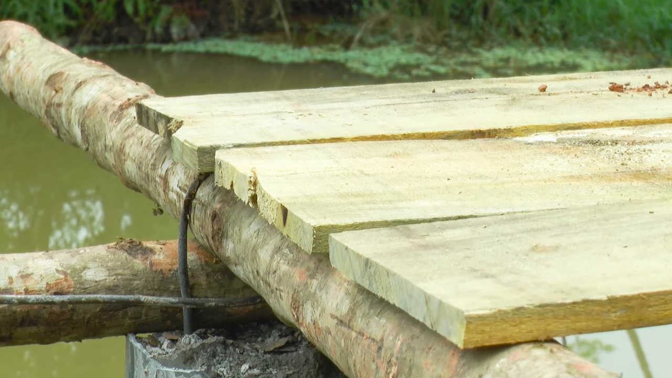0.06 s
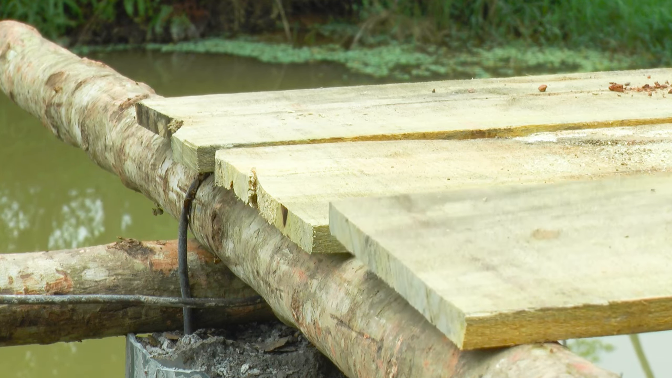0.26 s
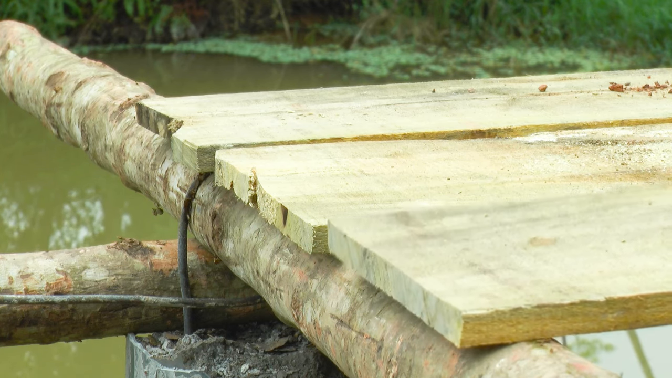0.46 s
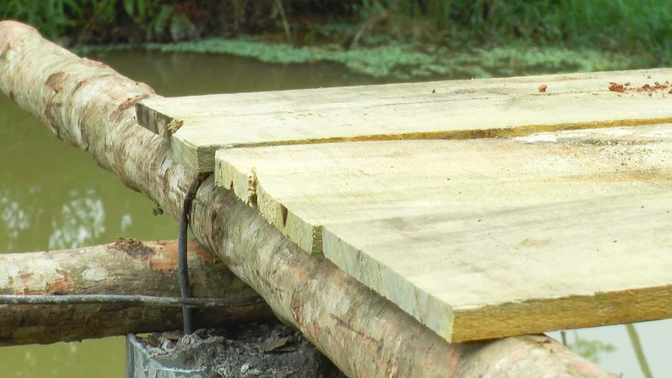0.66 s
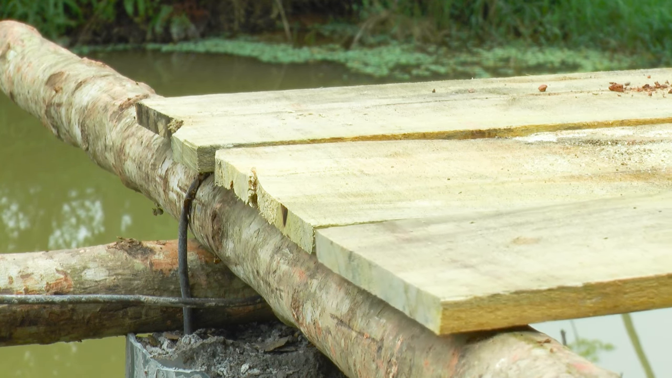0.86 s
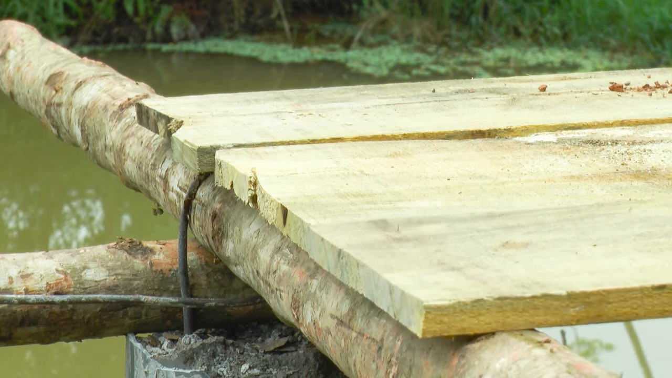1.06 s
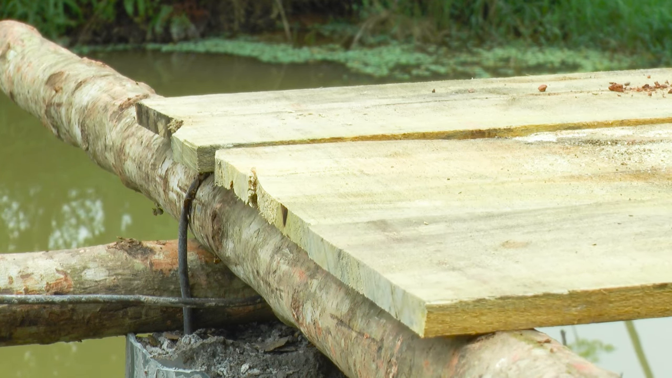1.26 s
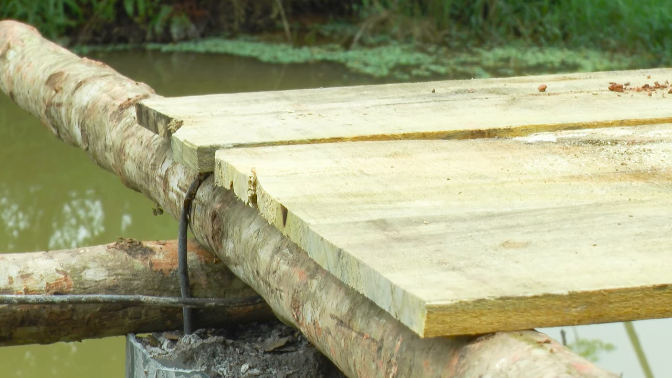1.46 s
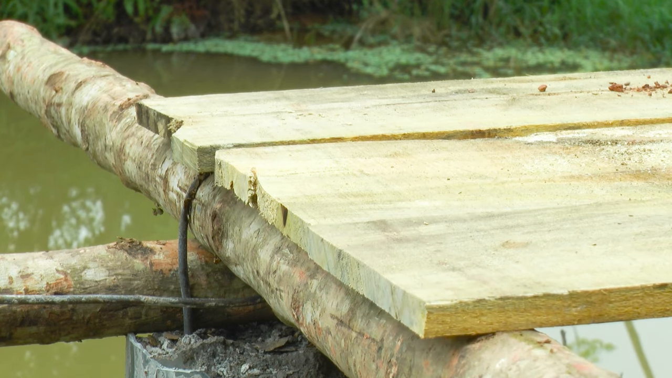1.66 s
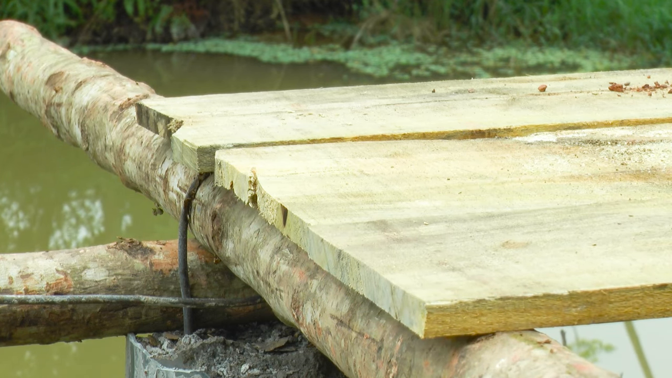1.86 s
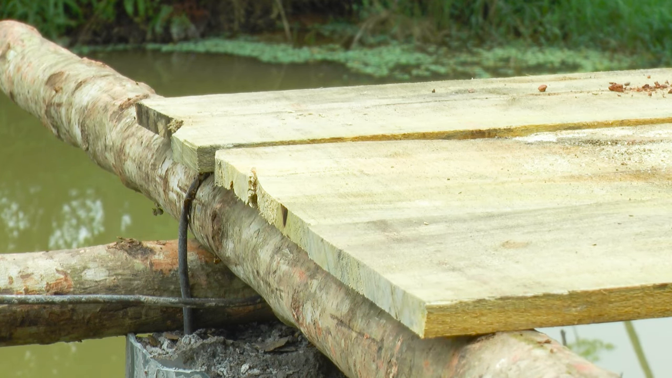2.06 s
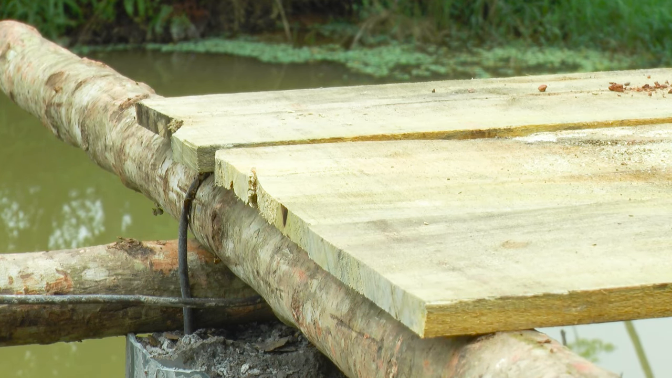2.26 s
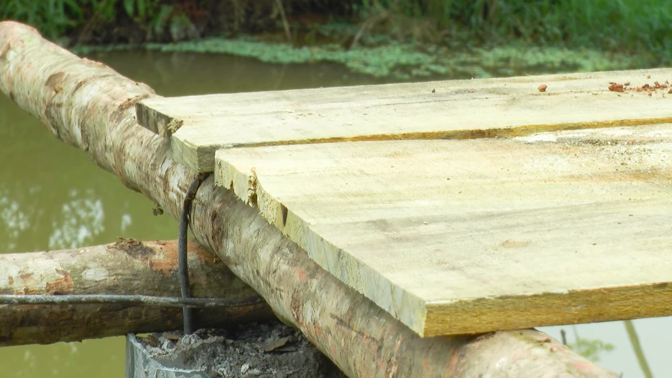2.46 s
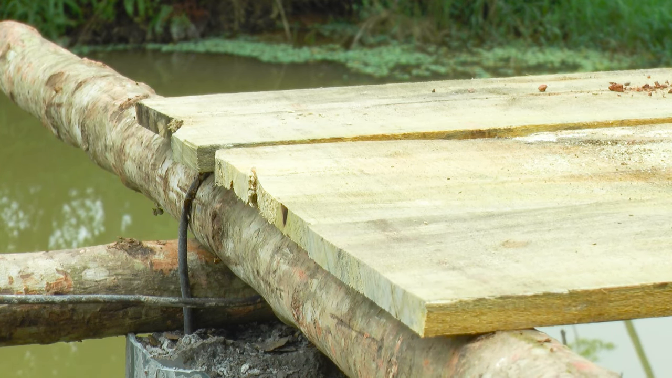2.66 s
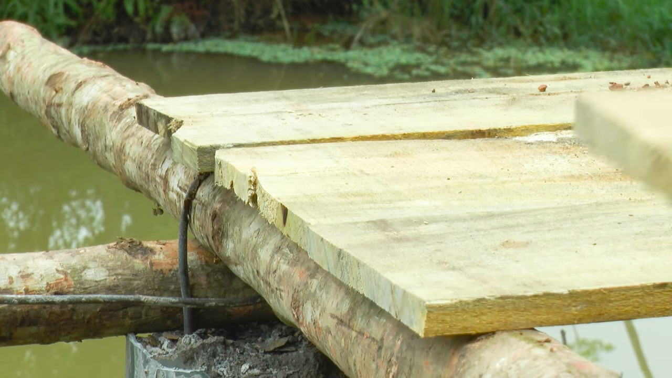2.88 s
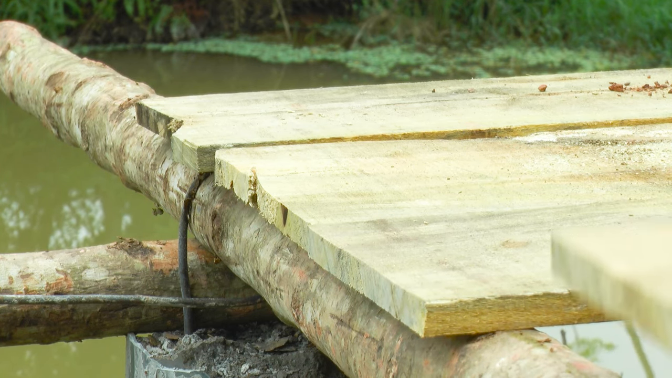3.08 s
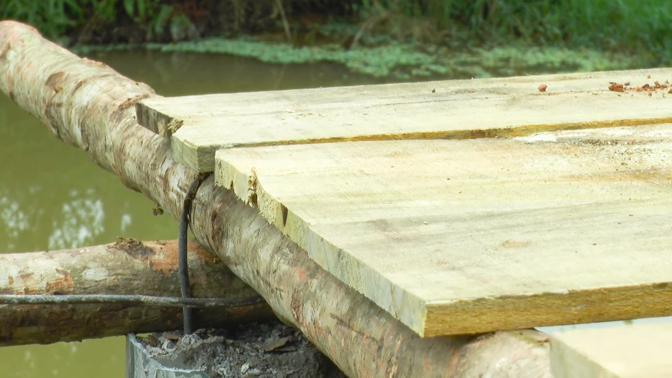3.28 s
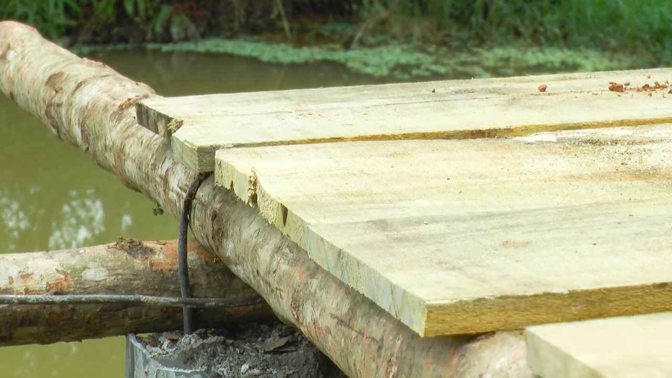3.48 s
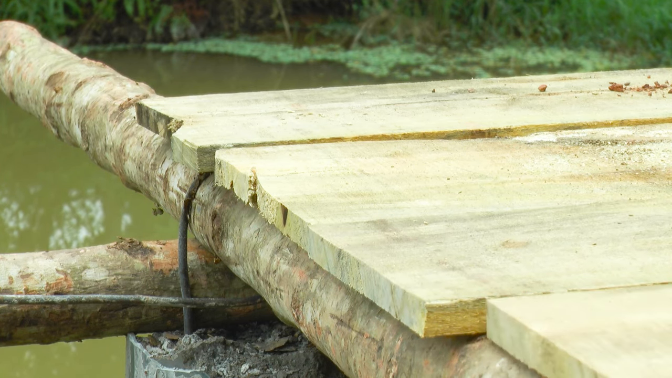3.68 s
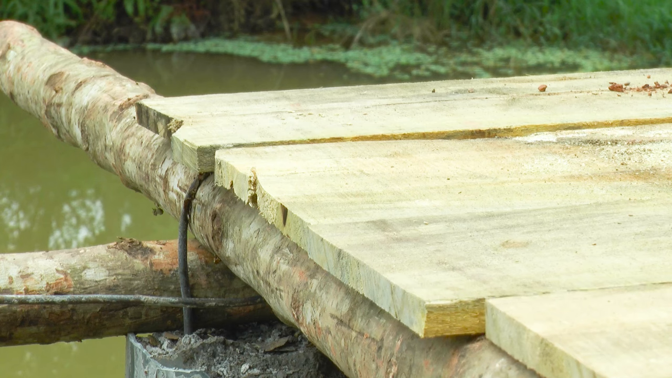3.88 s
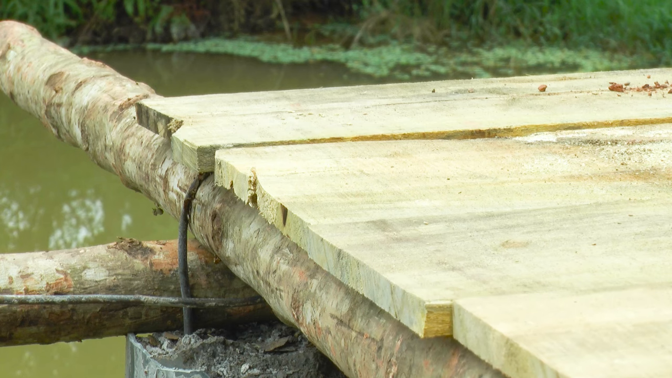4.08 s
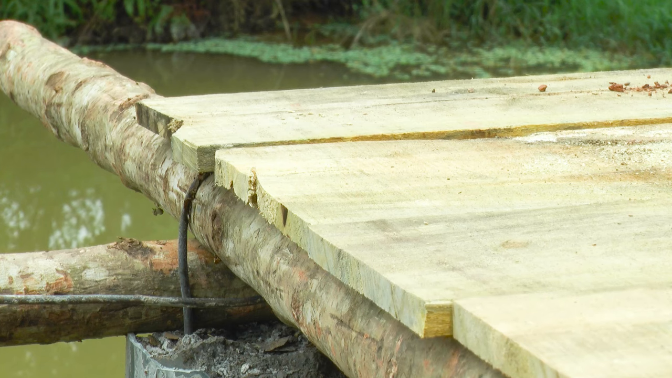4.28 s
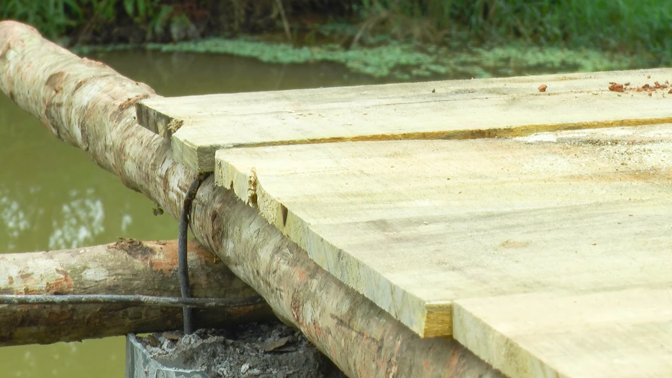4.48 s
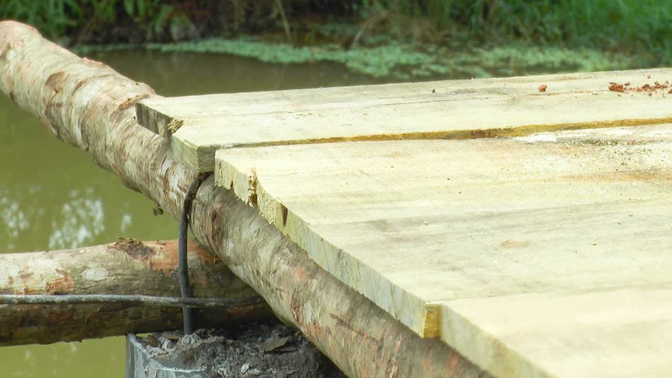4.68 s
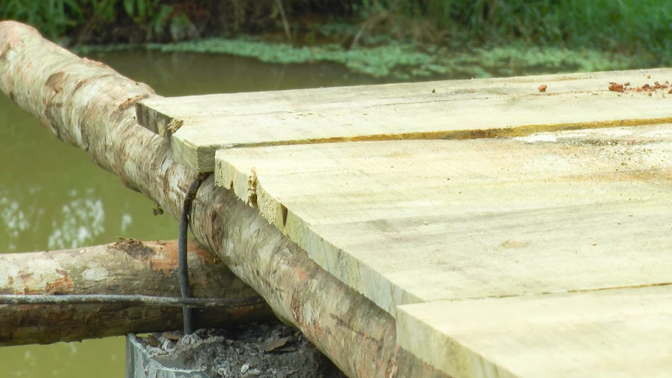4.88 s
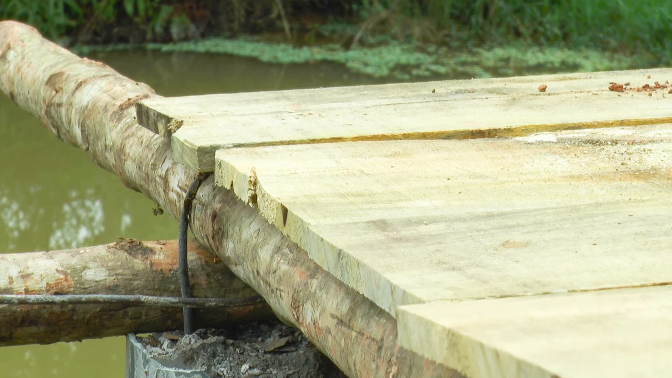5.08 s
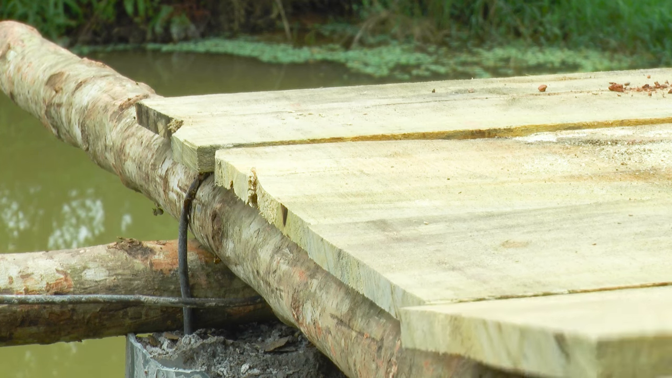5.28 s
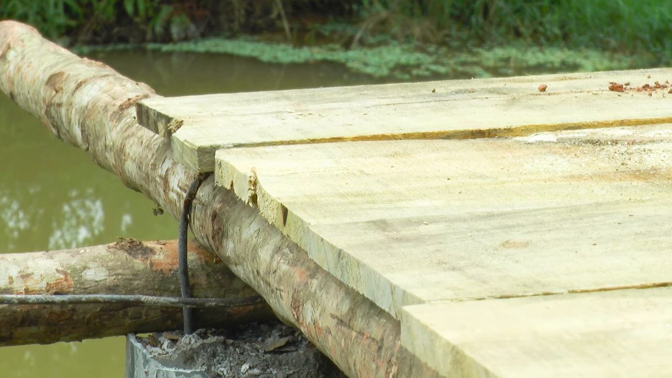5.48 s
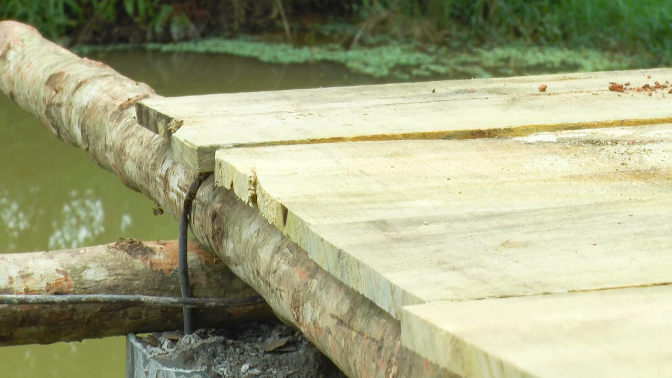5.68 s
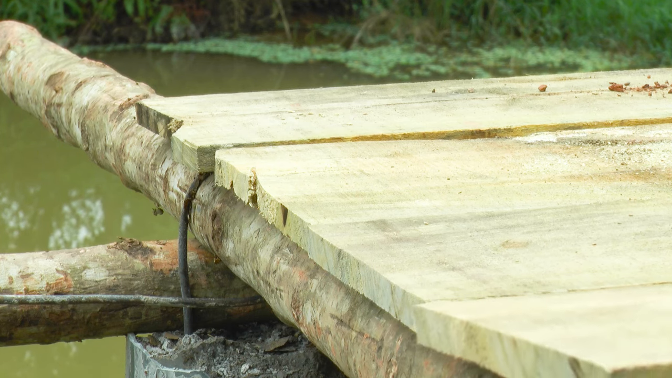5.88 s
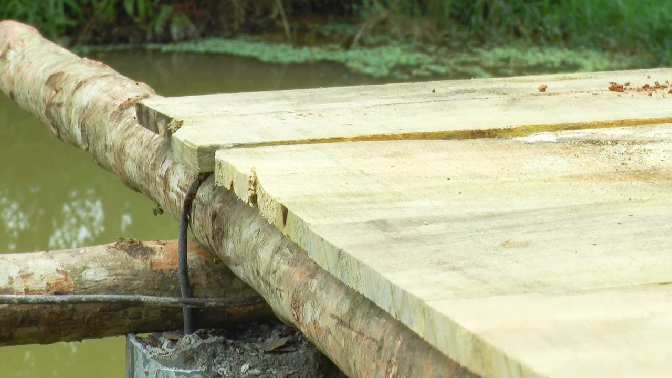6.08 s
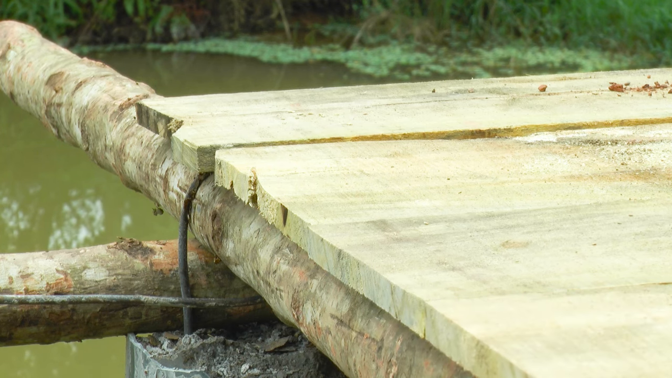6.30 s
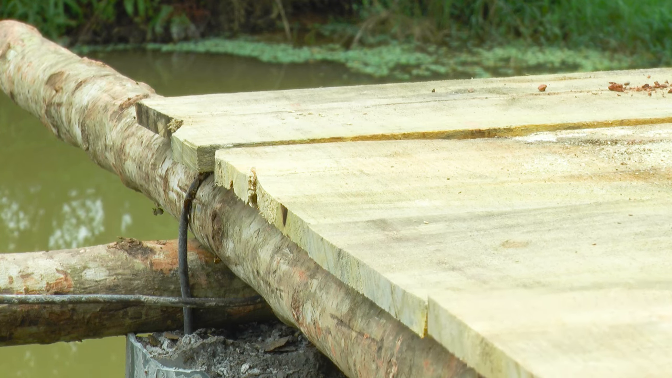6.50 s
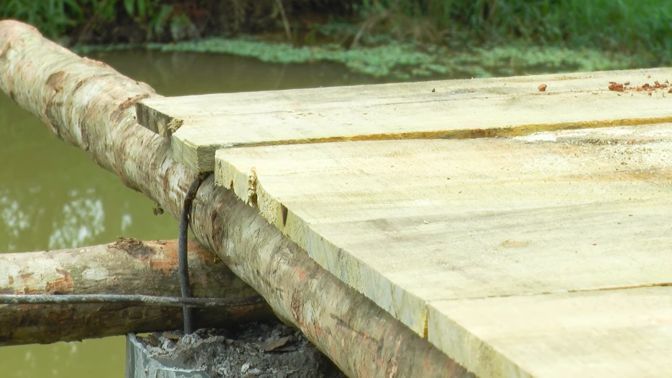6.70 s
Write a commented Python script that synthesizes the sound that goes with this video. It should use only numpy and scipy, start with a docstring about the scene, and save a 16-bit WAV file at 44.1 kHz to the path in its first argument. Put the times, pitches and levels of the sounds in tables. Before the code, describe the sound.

Sawn boards scrape and clatter onto a log frame in three hard landings, with dry rubs, light knocks and hushed outdoor air between.

```python
"""Two sawn boards are slid, dropped and nudged into place on a log frame beside a pond.
Each landing is a clatter of contacts: a filtered tap, decaying board and deck modes, a short noise crack.
Between landings rough wood rubs: bursts of random clicks, coloured and passed through resonances.
Behind: a thin scattered echo, a low noise rumble, a soft hiss that dips once, a faint hum that swells and fades.
"""
import sys
import numpy as np
from scipy import signal
from scipy.fft import rfft, irfft, next_fast_len
from scipy.io import wavfile

SR = 44100
rng = np.random.default_rng(int(sys.argv[2]) if len(sys.argv) > 2 else 0)


def materialize(psi):
    """Save the field psi as 16-bit PCM at rate SR to the path in sys.argv[1].

    A 1-D psi becomes a single channel; in a 2-D psi each row is a channel.
    """
    bounded = np.clip(np.atleast_2d(psi).T, -1, 1)
    quanta = np.round(bounded * 32767).astype(np.int16)
    wavfile.write(sys.argv[1], SR, quanta)


N = 297234

# rumble outdoors, before RUMBLE_TRIM_DB; the hiss follows partly: (time [s], level [dB])
AIR_LEVEL = [(0.0, -54), (1.09, -53), (1.29, -61.5), (1.73, -61.5), (3.59, -59), (3.94, -59.5),
             (6.74, -52.5)]
# noise colours: (frequency [Hz], relative density [dB])
RUMBLE_COLOUR = [(20, -28), (40, -10), (60, 1.5), (100, 1.5), (145, 2.5), (220, -8), (330, -8.5),
                 (480, -22.5), (800, -53), (2000, -68)]
HISS_COLOUR = [(200, 15), (500, 6.5), (900, 4.5), (1500, 2.5), (2400, -1), (3300, -1.5), (4200, -9),
               (6200, -5.5), (8000, -10), (9500, -14.5), (12000, -19), (16000, -21)]
RUB_COLOUR = [(100, -5), (300, 0.5), (600, 4), (1100, 6.5), (1800, 7.5), (2500, 3.5), (3300, 0.5),
              (4200, -13), (5500, -10), (7500, -13), (10000, -54), (16000, -62)]
SPLINTER_COLOUR = [(2000, -30), (5000, -2), (7500, 8), (10000, -5), (13000, -10), (16000, -9)]
CRACK_COLOUR = [(40, -20), (300, -4), (1200, 10), (2600, 0.5), (3400, -3.5), (4200, -22.5), (6500, -15.5),
                (10000, -26.5), (16000, -48)]
# faint far hum: (frequency [Hz], level at the peak [dB])
HUM_TONES = [(145.3, -59), (772, -72.5)]
# sliding strokes of rough wood: (time of top speed [s], rasp level [dB], rise [s], fall [s], edge note [Hz])
RUBS = [ (0.099, -48, 0.18, 0.041, 1570), (.605, -55.5, 0.094, 0.046, 2100),
        (.975, -43, 0.066, 0.048, 1820), (1.254, -55.5, 0.0042, 0.014, 2250),
        (1.69, -58, 0.063, 0.099, 2880), (2.21, -60.5, 0.11, 0.066, 1580), (2.485, -52, 0.069, 0.027, 1060),
        (2.60, -52.5, 0.013, 0.052, 1880), (2.876, -52, 0.009, 0.028, 2250),
        (3.242, -46, 0.047, 0.019, 3070), (3.661, -53.5, .14, 0.073, 1610),
        (4.105, -52.5, 0.062, .036, 1590), (4.794, -45.5, 0.036, .085, 2300),
        (5.55, -53.5, .02, 0.053, 2110), (5.9, -62, 0.029, 0.042, 1500), (6.044, -60, .04, .017, 2720),
        (6.355, -48.5, .065, 0.052, 1660), (6.388, -42.5, .006, 0.031, 1080),
        (6.679, -48.5, 0.03, 0.021, 930)]
# loose splinters brushing: (time of top speed [s], level [dB], rise [s], fall [s])
BRUSHES = [(2.612, -51.5, 0.0018, 0.011), (3.65, -65, 0.15, 0.1)]
# wood on wood: (time [s], level [dB], contact time [ms], bass [dB])
# bass is high when the face lands flat, low when an edge glances
BLOWS = [ (.310, -49, 0.66, 7.5), (.6206, -50, 0.35, -1), (.802, -52.5, 1.3, 9), (.977, -38, 1.54, -4),
         (1.0518, -32, .61, -35), (1.057, -27.5, 1.48, -6.5), (1.071, -34, .8, 4), (1.082, -28, 0.7, -3.5),
         (1.089, -29, 0.89, -1.5), (1.093, -31.5, 0.99, -1), (1.113, -32, .54, -36), (1.250, -46.5, 2.6, 0),
         (1.950, -58, 0.37, -22), (2.856, -50, 0.31, -0.5), (3.286, -27, 0.94, -4),
         (3.294, -33.5, 0.68, -29), (3.302, -31, 1.33, 15), (3.3245, -40, 0.47, -44),
         (3.325, -26.5, .87, -19.5), (3.3465, -29, 0.61, 5), (3.376, -26.5, 0.92, -6),
         (3.385, -30, 1.2, -7), (3.408, -35, 0.72, 4.5), (3.452, -39, 1.5, 0.5), (3.672, -46.5, 1, 3.5),
         (3.752, -54, 0.37, -3), (4.7682, -33.5, 0.72, -8), (4.774, -30.5, 0.9, 2),
         (4.785, -48.5, 0.31, -12), (4.7984, -42, .48, -14), (4.803, -27.5, 1.25, 1.5),
         (4.815, -35, 1.3, 6), (4.8334, -26.5, 1.03, -0.5), (4.8401, -28.5, 1.24, -0.5),
         (5.433, -52.5, 0.36, 1), (5.4421, -26, 1.35, -5.5), (5.457, -32.5, 1.43, 6), (5.472, -36, 1.9, 7),
         (5.699, -60.5, 0.46, -16), (6.199, -37.5, 1.52, 5), (6.407, -36.5, 1.2, 13.5),
         (6.615, -42, 1.42, 1), (6.671, -44, 0.56, 9)]
# board rocking to rest on the logs: (time of first bump [s], its level [dB], gap to the next [s])
ROCKINGS = [(.992, -40, 0.023), (3.427, -37, 0.035), (4.864, -36.5, .016), (5.482, -42, 0.021),
            (5.561, -52.5, 0.021), (6.215, -43, 0.011), (6.419, -46, .015)]
# bending and twisting modes of each board on the logs: (frequency [Hz], relative level [dB], t60 [s])
FIRST_BOARD_MODES = [(117.5, 7, 0.23), (149.6, -1, 0.39), (189, -8, 0.15), (288.6, 8, 0.09),
                     (349, 4.5, 0.26), (398.7, 5.5, 0.13), (523, 3.5, 0.11), (595, 3.5, 0.28),
                     (668, 1, 0.056), (788, 5.5, 0.12), (819, 3, 0.14), (870, 12.5, 0.044), (1055, 8, 0.2),
                     (1132, -4, 0.11), (1165, -1, 0.042), (1280, 4.5, 0.13), (1560, -8, 0.18),
                     (1800, -1, 0.061), (1830, 4, 0.051)]
SECOND_BOARD_MODES = [(80, -14, 0.31), (122.7, -10, 0.3), (153.6, 5, 0.15), (207.7, 1, 0.33),
                      (271.6, 4, 0.25), (303.9, 1, 0.35), (335, 6.5, 0.043), (392.6, 6, 0.13),
                      (460, 6.5, 0.059), (488, 5.5, 0.081), (504.6, 2, 0.18), (546, 3.5, 0.2),
                      (572, -3, 0.12), (646, -17, 0.19), (691, 2, 0.041), (681, 7.5, 0.11), (764, -9, 0.3),
                      (879, 4.5, 0.09), (1005, -5, 0.25), (1070, -29, .14), (1104, -2.5, 0.18),
                      (1284, -6, 0.13), (1337, -11, .11), (1775, 0, 0.072), (2308, 4, 0.048),
                      (2650, 7.5, 0.04)]
# drum note of the free span, set by how the board lies:
# (valid from [s], frequency [Hz], relative level [dB], t60 [s])
SPANS = [(0, 307, -6, .2), (2.7, 197.6, 3.5, .25), (4.5, 303, 8.5, 0.05), (5.2, 512, 8, 0.071),
         (6.0, 304, -1, 0.22)]
# crowded weak modes of deck and frame: (frequency [Hz], relative density [dB])
DECK_LEVEL = [(30, -33), (60, -5), (100, 0), (250, 7.5), (600, 2), (1500, -1), (3000, -0.5), (8000, -12)]
# their decay: (frequency [Hz], t60 [s])
DECK_T60 = [(100, 0.07), (400, 0.2), (1000, 0.12), (2500, 0.045), (8000, 0.17)]

RUMBLE_TRIM_DB, HISS_DB, HISS_DB_PER_AIR_DB = -.5, -60, 0.54
# DIP_DB is the depth before the recovery acts on it
DIP_S, DIP_DB, DIP_FALL_S, DIP_RECOVERY_S = 1.11, -19, 0.015, 0.18
HUM_PEAK_S, HUM_SLOPE_DB_PER_S = 5.26, 5
# the higher the edge's note, the less a stroke stirs the board; body level holds at EDGE_REF_HZ
RUB_BODY_DB, RUB_BODY_DB_PER_OCTAVE, EDGE_REF_HZ = -2.5, -3.5, 1800
RUB_SPLINTER_DB = -28
SECOND_BOARD_FROM_S = 2.7
# ring and crack relative to the thump, for a flat blow of level FIRM_DB
FIRM_DB, RING_DB, CRACK_DB = -30, 0.5, -27.5
# a lighter blow leaves the board freer to ring and its fibres stand out; a glancing edge hardly rings it
RING_DB_PER_LIGHTER_DB, CRACK_DB_PER_LIGHTER_DB, RING_DB_PER_BASS_DB = 0.2, 0.39, 0.22
# each bump is soft and flat, weaker than the last and after a shorter gap
BUMP_MS, BUMP_BASS_DB, BUMP_LOSS_DB, BUMP_GAP_RATIO = 2.33, 8, 8.5, 0.97
TOP_HZ = 15800


def undb(db):
    """Decibels to gain."""
    return 10 ** (np.asarray(db) / 20)


def unit(x):
    """Scale to rms 1."""
    return x / np.sqrt(np.mean(x ** 2))


def curve(rows):
    """Columns of a time table, joined by straight lines."""
    s, *columns = np.transpose(rows)
    return [np.interp(np.arange(N) / SR, s, c) for c in columns]


def along(points, hz):
    """Read (Hz, value) points on a log-frequency axis."""
    f, value = np.transpose(points)
    return np.interp(np.log(np.maximum(hz, 1)), np.log(f), value)


def colour(x, points):
    """Filter a sound by the response of (Hz, dB) points."""
    size = next_fast_len(len(x))
    gain = undb(along(points, np.fft.rfftfreq(size, 1 / SR)))
    return irfft(rfft(x, size) * gain, size)[:len(x)]


def walk(rate_hz):
    """Slow random wander: normal knots joined by lines, spread near 1."""
    knots = np.arange(N) / SR * rate_hz
    return np.interp(knots, np.arange(4096), rng.standard_normal(4096))


def outdoors(hiss_walk_db=1.8, waver_hz=1.0):
    """Low noise rumble, smooth hiss that dips abruptly and creeps back, faint wavering hum."""
    now = np.arange(N) / SR
    air_db, = curve(AIR_LEVEL)
    rumble = unit(colour(rng.standard_normal(N), RUMBLE_COLOUR)) * undb(air_db + RUMBLE_TRIM_DB)

    since = np.maximum(now - DIP_S, 0)
    dip_db = DIP_DB * np.minimum(since / DIP_FALL_S, 1) * np.exp(-since / DIP_RECOVERY_S)
    hiss_db = HISS_DB + HISS_DB_PER_AIR_DB * (air_db - air_db.mean()) + dip_db
    hiss_db = hiss_db + hiss_walk_db * walk(2.9)
    hiss = unit(colour(rng.standard_normal(N), HISS_COLOUR)) * undb(hiss_db)

    hum = np.zeros(N)
    for hz, db in HUM_TONES:
        phase = 2 * np.pi * np.cumsum(hz + waver_hz * walk(4.56)) / SR
        hum += undb(db) * unit(np.sin(phase))
    hum *= undb(-HUM_SLOPE_DB_PER_S * np.abs(now - HUM_PEAK_S))
    return rumble + hiss + hum


def banks(x, t60_s=0.72, wet_db=-27, build_s=0.016):
    """Wooded banks scatter a thin, late wash back: convolution with decaying noise."""
    t = np.arange(SR) / SR
    scatter_colour = [(100, -6), (400, -19), (1300, -6.5), (2200, -11.0), (4000, -3), (12000, -15.0)]
    scatter = colour(rng.standard_normal(SR), scatter_colour)
    echo = scatter * undb(-60 * t / t60_s) * (1 - np.exp(-t / build_s))
    echo = echo / np.sqrt(np.sum(echo ** 2))
    return undb(wet_db) * signal.fftconvolve(x, echo)[:N]


def board_ring(modes, t, spacing_hz=60):
    """A board's answer to a tap: decaying cosines, each with the energy of its stretch of spectrum."""
    hz, db, t60_s = np.transpose(modes)[:, :, None]
    decay = np.log(1000) / t60_s
    size = undb(db) * np.sqrt(2 * 2 * 2 * spacing_hz * decay) / SR
    sign = (-1) ** np.arange(len(modes))[:, None]  # neighbouring modes move the far end opposite ways
    return np.sum(sign * size * np.exp(-decay * t) * np.cos(2 * np.pi * hz * t), axis=0)


def stroke(s, rise_s, fall_s):
    """Samples that a sliding stroke covers, and its relative speed there."""
    now = np.arange(N) / SR
    away = np.maximum((s - now) / rise_s, (now - s) / fall_s)
    on = away < 4
    return on, np.exp(-away[on] ** 1.32)


def rubbing(t, boards, catch_db=3.5, catch_rate_hz=110, edge_db=-5, edge_q=5.9):
    """Rough fibres catch and slip in dense clicks that rasp, ring the edge and stir the board."""
    sizes = undb(3.5 * np.minimum(rng.exponential(size=N), 4))
    slips = rng.standard_normal(N) * sizes * undb(catch_db * walk(catch_rate_hz))
    rasp = unit(colour(slips, RUB_COLOUR))
    splinters = unit(colour(slips[::-1], SPLINTER_COLOUR))  # reversed, so unlike the rasp
    # small slips hardly bend the whole board
    drive = colour(slips, [(100, -13), (300, -1.5), (600, 1.5), (2000, -7)])
    bodies = [unit(signal.fftconvolve(drive, board)[:N]) for board in boards]

    out = np.zeros(N)
    for s, db, rise_s, fall_s, edge_hz in RUBS:
        on, speed = stroke(s, rise_s, fall_s)
        body_db = RUB_BODY_DB + RUB_BODY_DB_PER_OCTAVE * np.log2(edge_hz / EDGE_REF_HZ)
        body = bodies[int(s > SECOND_BOARD_FROM_S)][on]
        b, a = signal.iirpeak(edge_hz, edge_q, fs=SR)
        edge = unit(signal.lfilter(b, a, rng.permutation(slips[on])))
        rub = rasp[on] + undb(edge_db) * edge + undb(body_db) * body
        rub = rub + undb(RUB_SPLINTER_DB) * splinters[on]
        out[on] += undb(db) * speed * rub
    for s, db, rise_s, fall_s in BRUSHES:
        on, speed = stroke(s, rise_s, fall_s)
        out[on] += undb(db) * speed * splinters[on]
    return out


def bumps(count=3):
    """Soft, dying contacts of a board rocking to rest, as rows like those of BLOWS."""
    rows = []
    for s, db, gap_s in ROCKINGS:
        for k in range(count):
            rows.append((s, db - k * BUMP_LOSS_DB, BUMP_MS, BUMP_BASS_DB))
            s = s + gap_s * BUMP_GAP_RATIO ** k
    return rows


def deck_rings(t, count):
    """A crowd of weak modes per contact: noise in half-octave bands, each with its own decay."""
    hz = np.fft.rfftfreq(len(t), 1 / SR)
    noise = rfft(rng.standard_normal((count, len(t))))
    edges_hz = 40 * 2 ** np.arange(0, 9, .5)
    out = 0
    for low, high in zip(edges_hz, edges_hz[1:]):
        centre = np.sqrt(low * high)
        decay = np.log(1000) / along(DECK_T60, centre)
        envelope = undb(along(DECK_LEVEL, centre)) * np.sqrt(2 * decay / SR) * np.exp(-decay * t)
        out = out + envelope * irfft(noise * ((hz >= low) & (hz < high)), len(t))
    return out


def contact(x, contact_ms, bass_db, travel_ms=1.33, bass_share=0.49, baffle_hz=65, damping=0.69):
    """Shape a blow: long contact pushes no treble; a glancing edge has no bass and clacks a few cycles."""
    hz = np.fft.rfftfreq(len(x), 1 / SR)
    khz = hz / 1000
    s = 1j * khz * contact_ms  # corner at 1 / contact_ms kHz
    loss = damping * undb(bass_db / 3)
    push = 1 / ((s * s + loss * s + 1) * (s * s + 2 * s + 1))
    shelf = ((s + bass_share * undb(bass_db / 2)) / (s + bass_share)) ** 2
    baffle = (1j * hz / (1j * hz + baffle_hz)) ** 3  # air slips round a narrow board at low pitch
    # high bending waves run ahead of low ones: delay is travel_ms at 1 kHz
    bending = np.exp(-2j * np.pi * 2 * travel_ms * np.sqrt(khz))
    return irfft(rfft(x) * push * shelf * baffle * bending, len(x))


def clatter(t, boards, board_db=1, crack_s=0.011, snap_db=-4):
    """Each contact: a thump, the ring of board, span and deck, a short crack of crushed fibres."""
    out = np.zeros(N + len(t))
    contacts = list(BLOWS) + bumps()
    decks = deck_rings(t, count=len(contacts))
    crack_envelope = np.exp(-t / crack_s) * np.sqrt(2 / (crack_s * SR))
    fibres = rng.standard_normal((len(contacts), len(t))) * crack_envelope
    tap = signal.unit_impulse(len(t))
    snap = undb(snap_db) * signal.unit_impulse(len(t), SR // 1000)
    early = SR // 50  # the level is the rms of the first 20 ms
    fade = np.minimum(1, 10 * (1 - t / t[-1]))
    for (s, db, contact_ms, bass_db), deck, fibre in zip(contacts, decks, fibres):
        lighter_db = FIRM_DB - db
        ring_db = RING_DB + RING_DB_PER_LIGHTER_DB * lighter_db + RING_DB_PER_BASS_DB * bass_db
        crack_db = CRACK_DB + CRACK_DB_PER_LIGHTER_DB * lighter_db
        span = [mode for since, *mode in SPANS if since <= s][-1]
        board = boards[int(s > SECOND_BOARD_FROM_S)]
        ring = undb(board_db) * board + board_ring([span], t) + deck
        blow = contact(tap + undb(ring_db) * ring, contact_ms, bass_db)
        blow = fade * (blow + undb(crack_db) * colour(snap + fibre, CRACK_COLOUR))
        start = int(s * SR)
        out[start:start + len(t)] += undb(db) * blow / np.sqrt(np.mean(blow[:early] ** 2))
    return out[:N]


def scene():
    """The handled boards, their echo and the open air."""
    t = np.arange(16384) / SR
    boards = [board_ring(FIRST_BOARD_MODES, t), board_ring(SECOND_BOARD_MODES, t)]
    wood = clatter(t, boards) + rubbing(t, boards)
    return (wood + banks(wood) + outdoors())[None]


def record(dry):
    """Steep elliptic low-pass at TOP_HZ."""
    return signal.sosfilt(signal.ellip(10, .2, 70, TOP_HZ, fs=SR, output="sos"), dry)


dry = scene()
out = record(dry)
materialize(out)
```